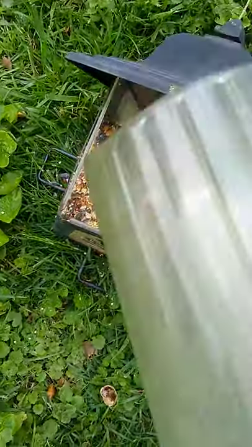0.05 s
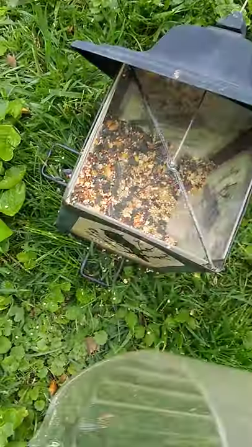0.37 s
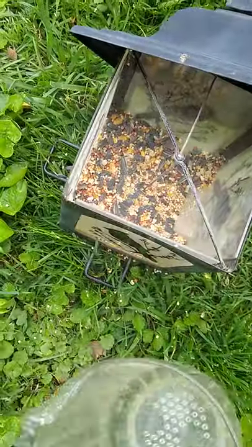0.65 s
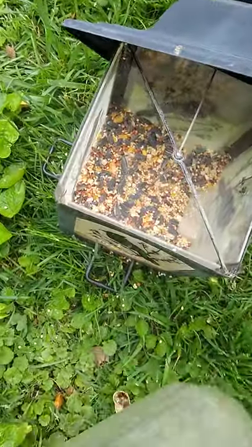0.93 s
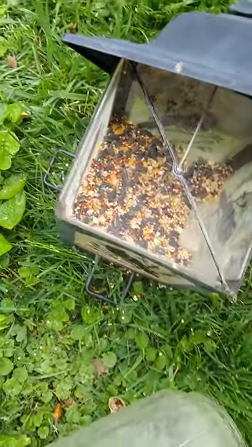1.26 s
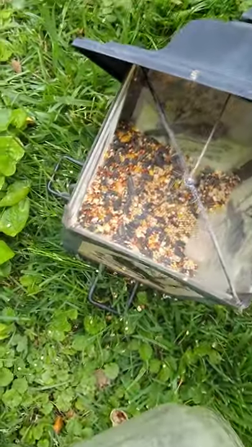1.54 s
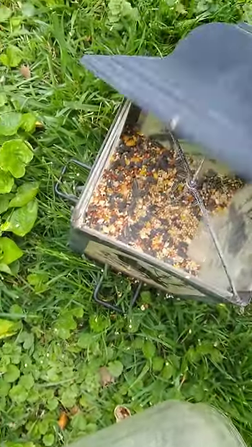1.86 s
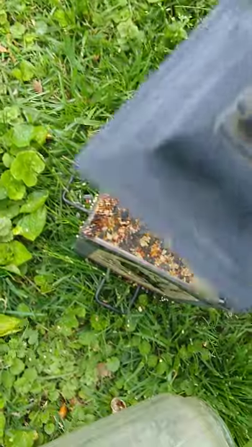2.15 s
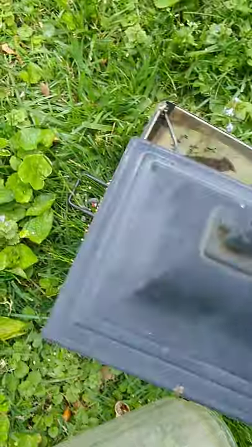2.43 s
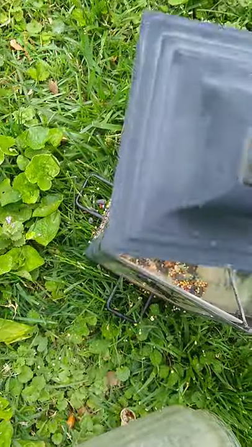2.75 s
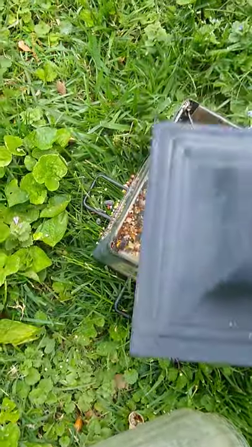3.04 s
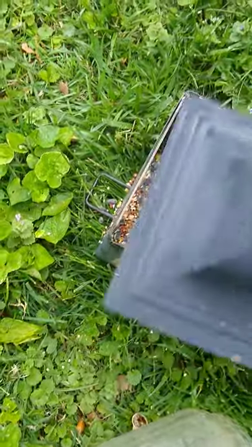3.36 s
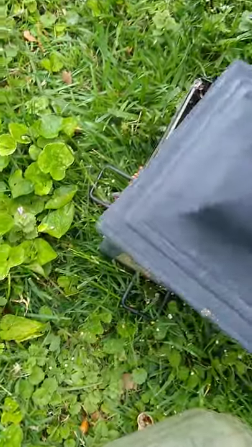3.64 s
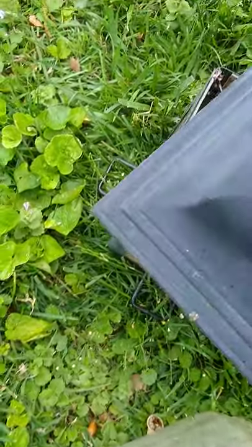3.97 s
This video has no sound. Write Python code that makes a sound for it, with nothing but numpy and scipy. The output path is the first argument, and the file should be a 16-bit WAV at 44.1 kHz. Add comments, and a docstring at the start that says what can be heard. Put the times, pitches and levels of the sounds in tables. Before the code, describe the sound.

A sheet-metal lid clanks against a bird feeder close below the microphone. After a moment of quiet garden air come a short clatter, a few separate ringing knocks and a final quick rattle, over soft handling rumble.

```python
"""In a garden, a sheet-metal lid is fitted onto a bird feeder standing in grass, close below the mic.
The lid knocks and rattles on the feeder's rim. Each contact rings its modes according to where it lands,
with a wash of dense overtones, a short crack and a thud of the box.
Quiet outdoor air lies underneath; a soft handling rumble joins just before the first knock."""
import sys
import numpy as np
from scipy import signal
from scipy.fft import rfft, irfft
from scipy.io import wavfile

SR = 44100
rng = np.random.default_rng(int(sys.argv[2]) if len(sys.argv) > 2 else 0)


def transcribe(u):
    """Save the signal u as a 16-bit wav file named by the first command-line argument.

    u: samples, shape (n,) or (channels, n), limited to [-1, 1]; the rate is SR.
    q: integer samples, one column per channel.
    """
    v = np.clip(np.atleast_2d(u).T, -1, 1)
    q = np.round(v * 32767).astype(np.int16)
    wavfile.write(sys.argv[1], SR, q)


N = 176400


def undb(db):
    """Decibels to gain."""
    return 10 ** (np.asarray(db) / 20)


def at(points, hz):
    """Read a (Hz, value) table on a log-frequency axis."""
    f, v = np.array(points, float).T
    return np.interp(np.log(np.maximum(hz, 1)), np.log(f), v)


def bins(size):
    """FFT bin frequencies in Hz."""
    return np.arange(size // 2 + 1) * SR / size


def noise(spectrum, size):
    """Unit-rms noise shaped by a (Hz, dB) table."""
    x = irfft(rfft(rng.standard_normal(size)) * undb(at(spectrum, bins(size))), size)
    return x / x.std()


def noise_pair(spectrum, size):
    """Two independent noises of one spectrum."""
    return np.array([noise(spectrum, size), noise(spectrum, size)])


def fade(t, t60_s):
    """Exponential decay, 60 dB in t60_s."""
    return np.exp(-np.log(1000) * t / t60_s)


def pan(db):
    """Left and right gain rows for L-R differences in dB."""
    return undb(np.outer([1, -1], db) / 2)


def add(out, x, start_s):
    """Mix stereo x into out at start_s."""
    i = int(start_s * SR)
    x = x[:, :N - i]
    out[:, i:i + x.shape[1]] += x


def diffuse_noise(spectrum):
    """Diffuse noise at the two mic ports; the bass is in antiphase."""
    # Stereo width. Each row: frequency in Hz, side minus mid in dB.
    width = [(60, 14.5), (110, 14.5), (200, 2), (380, -0.5), (700, -11.5), (1290, -7), (2380, 4.5),
             (4400, -2), (15000, 0)]
    side = irfft(rfft(noise(spectrum, N)) * undb(at(width, bins(N))), N)
    mid = noise(spectrum, N)
    return (mid + np.outer([1, -1], side)) * pan(db=-0.5)


def garden():
    """Low outdoor rumble and faint hiss, swelling slowly."""
    # Outdoor air. Each row: frequency in Hz, relative density in dB.
    spectrum = [(15, -61.5), (25, -17), (122, -2), (221, -5), (281, -14), (313, -6), (445, -18.5),
                (567, -14.5), (782, -16.5), (1080, -15.5), (1950, -25), (2230, -29), (3260, -20.5),
                (4500, -30.5), (4870, -26.5), (6920, -39), (15500, -44.5)]
    swell_db = -0.48 * np.interp(np.arange(N), np.linspace(0, N, 20), rng.standard_normal(20))
    return diffuse_noise(spectrum) * undb(-65.5 + swell_db)


def handling(start_s=1.95, rise_s=0.085):
    """Soft rumble once the lid is being moved about."""
    # Rumble. Each row: frequency in Hz, relative density in dB.
    spectrum = [(30, -19.5), (70, 3), (120, 1.5), (220, -1.5), (400, -9), (900, -13.5), (3000, -45.5)]
    onset = np.clip((np.arange(N) / SR - start_s) / rise_s, 0, 1)
    return diffuse_noise(spectrum) * undb(-66.5) * onset


def box_thud(t, knock_db):
    """Thud of the feeder box; follows about half of the knock's level in dB."""
    # Box response. Each row: frequency in Hz, relative density in dB.
    spectrum = [(25, -31), (70, 4.5), (130, -2), (250, 3.5), (450, 0), (900, 3.5), (2500, -34)]
    thud = noise(spectrum, len(t)) + 0.5 * noise_pair(spectrum, len(t))
    return undb(-40 + 0.53 * knock_db) * thud * fade(t, t60_s=0.23)


def contact_crack(t):
    """Short noise burst of the contact, as two independent signals."""
    # Contact noise. Each row: frequency in Hz, relative density in dB.
    spectrum = [(30, -36.5), (150, -13), (400, -4.5), (800, 10), (1500, -0.5), (2100, 2), (3500, -12),
                (5500, -4.5), (7000, -13), (15500, -31.5)]
    return undb(-22.5) * noise_pair(spectrum, len(t)) * fade(t, t60_s=0.039)


def dense_modes(t, count=220):
    """The sheet's many weak modes, in sine and cosine phase; higher ones tend to die sooner."""
    # Overtone envelope. Each row: frequency in Hz, level per mode in dB.
    levels = [(450, -51.5), (700, -46), (1000, -44.5), (1500, -41), (2000, -49.5), (2500, -40), (3500, -38),
              (5500, -44), (6700, -55), (8000, -55.5), (11000, -61), (15500, -64.5)]
    hz = np.linspace(np.sqrt(450), np.sqrt(15500), count) ** 2
    hz *= 1 + 0.008 * rng.standard_normal(count)
    t60_s = 0.18 * (3000 / hz) ** 0.16 * np.exp(0.22 * rng.standard_normal(count))
    phase = np.outer(2 * np.pi * hz, t)
    decay = undb(at(levels, hz))[:, None] * fade(t, t60_s[:, None]) / np.sqrt(2)
    return np.vstack([decay * np.sin(phase), decay * np.cos(phase)])


def lid_ring(place, t):
    """Stereo spectra of the main ring and soft after-ring for one place of contact; close modes beat."""
    # Lid modes. Each row: frequency in Hz, T60 in s, L-R in dB, level in dB struck at corner, side, rim.
    modes = [ (427.2, 0.79, 5.5, -63, -54.5, -49), (595, 0.067, 4.5, -39, -26, -40.5),
             (660.5, 0.2, 2, -27.5, -21, -36), (681.4, 0.198, 3, -29.5, -23.5, -53.5),
             (867, .13, 2, -30, -36, -23), (925, .08, 1, -23, -33, -35), (1000, .07, 0, -25, -31, -38),
             (1329.5, .29, -1, -31, -26, -31), (1424, .28, -5, -37, -22, -29),
             (1608.4, 0.19, -6, -33, -27.5, -40.5), (1905, 0.11, -1, -40.5, -25, -29.5),
             (2260, .17, -0.5, -28.5, -35.5, -28.5), (2335, 0.16, 5, -39, -23, -45),
             (2370, 0.44, 1.5, -25, -27.5, -38), (2442, 0.33, 3, -22.5, -25.5, -31),
             (2490, .22, -1, -28, -44, -31), (2625, .22, 2, -44, -23, -45), (2793, .2, 2, -30, -38, -33),
             (3146, .25, 3, -32, -27, -32), (3199, .23, 5, -30, -35, -50), (3350, .16, 5, -28, -44, -46),
             (3495, .2, 3, -36, -33, -46), (3732, .14, 7, -26, -42, -44), (3947, .18, 5, -35, -27, -45),
             (3978, .19, 8, -27, -30, -36), (4258, .17, 3, -35, -38, -43), (4715, .17, 9, -28, -31, -44),
             (5100, 0.23, 17, -46.5, -42.5, -46.5), (5300, 0.12, 3, -52, -33.5, -51.5),
             (5480, 0.12, 3.5, -48, -26.5, -43), (5560, 0.21, 6, -45, -34.5, -40),
             (6155, 0.11, 5, -36.5, -37, -47)]
    # Modes that sing on. Each row: frequency in Hz (picks the nearest mode), T60 in s, level in dB.
    lingering = [(685, 1.9, -53.5), (1329, 1.19, -43), (1430, 0.33, -41.5), (3146, 1.18, -50),
                 (3199, 0.85, -54.5)]
    hz, t60_s, pan_db, corner_db, side_db, rim_db = np.array(modes, float).T
    mode_db = {"corner": corner_db, "side": side_db, "rim": rim_db}[place]
    polarity = (-1) ** np.arange(len(hz))[:, None]
    waves = polarity * np.sin(np.outer(2 * np.pi * hz, t))
    gains = pan(pan_db)
    ring = (gains * undb(mode_db)) @ (waves * fade(t, t60_s[:, None]))
    after_ring = np.zeros_like(ring)
    for slow_hz, slow_t60_s, db in lingering:
        k = np.argmin(abs(hz - slow_hz))
        envelope = fade(t, slow_t60_s) * (1 - fade(t, slow_t60_s / 2))
        after_ring += np.outer(gains[:, k], undb(db) * waves[k] * envelope)
    return rfft(ring), rfft(after_ring)


def lid_knocks():
    """Each knock rings the same sheet, coloured by how hard and sharp the contact is; the box thuds."""
    # Contacts. Each row: start in seconds, place, level in dB, then offsets in dB for
    # bass, middle, top, dense overtones, crack, after-ring.
    knocks = [ (2.0403, "corner", -0.5, -3, -2.5, 1, 1, 0.5, -10),
              (2.0660, "corner", -7.5, -1, 6.5, 2.5, 0, 3, -22),
              (2.0905, "side", -13, 7.5, 2, -1.5, -1, 3, -21),
              (2.1420, "side", -25, 9.5, -1, -8, -9, 3, -16),
              (2.4440, "side", -19.5, 6.5, 4, -11.5, -0.5, 6.5, 3.5),
              (2.4670, "corner", -35.5, -8, 11, 1.5, -15, 14, -9),
              (2.8378, "side", 1, 1.5, -1.5, -3.5, 0, 0.5, 0.5),
              (2.8725, "side", -8.5, 10, -3.5, -3.5, 0.5, 1.5, -9),
              (3.3730, "side", -9, -12, -11.5, -10.5, -2, 10, 0),
              (3.6870, "rim", 0, -1.5, -3, -5.5, -9, -6, 5),
              (3.7255, "side", -24, 8, 3, -14, -12, -11, -16),
              (3.8290, "rim", -0.5, 2, -6.5, -15.5, -3.5, -6.5, -5),
              (3.8655, "rim", -8.5, 8, -0.5, -7.5, -3.5, -1.5, 5),
              (3.8925, "rim", -8.5, 9.5, -6.5, -16, -5, -7, 0),
              (3.9200, "side", -8.5, 3.5, -6, -11, 2, 2.5, 11),
              (3.9570, "corner", -23, 9, 6, -12, 2, -10, -5)]
    # Phase between the mic ports. Each row: frequency in Hz, lead of the left in radians.
    port_phase = [(20, 0), (900, 0), (1330, .3), (1600, .7), (1880, 2.4), (2300, 3), (2750, 3.6),
                  (3146, 6.2), (3500, 6.4), (3960, 7.9), (4715, 9.6), (6135, 13.3), (16000, 38.3)]
    # Balance of overtones and crack. Each row: frequency in Hz, L-R in dB.
    port_balance = [(200, 3), (600, 6), (1000, 1), (1600, -6), (2400, 5.5), (3500, 3.5), (5000, 7.5),
                    (8000, 11), (14000, 6.5)]
    # Their part that differs between ports. Each row: frequency in Hz, side minus mid in dB.
    port_scatter = [(500, -20.5), (2000, -9.5), (5000, -10.5), (9000, -5.5)]
    t = np.arange(SR) / SR
    t_short = t[:SR // 3]
    hz = bins(len(t))
    rings = {place: lid_ring(place, t) for place in ("corner", "side", "rim")}
    overtones = dense_modes(t_short)
    balance = pan(at(port_balance, hz))
    scatter = np.outer([1, -1], undb(at(port_scatter, hz)))
    lead_s = 0.02  # room for filter pre-ringing
    lag_rad = np.outer([0, 1], np.interp(hz, *np.array(port_phase).T))
    port_delay = np.exp(-1j * (lag_rad + 2 * np.pi * hz * lead_s))
    out = np.zeros((2, N))
    for start_s, place, db, bass_db, middle_db, top_db, dense_db, crack_db, after_db in knocks:
        crack = undb(crack_db) * contact_crack(t_short)
        wash = undb(dense_db) * (rng.standard_normal((2, len(overtones))) @ overtones)
        mid, side = rfft(crack + wash, len(t))
        ring, after_ring = rings[place]
        knock = ring + undb(after_db) * after_ring + balance * (mid + scatter * side)
        colour_db = at([(800, bass_db), (1450, middle_db), (2400, 0), (9000, top_db)], hz)
        add(out, irfft(knock * undb(db + colour_db) * port_delay), start_s - lead_s)
        add(out, box_thud(t_short, db), start_s)
    return out


def scene():
    """The lid and its handling over the garden background."""
    return lid_knocks() + handling() + garden()


def record(dry):
    """The lowest bass is rolled off, and the recorder cuts the top."""
    low_cut_hz, high_cut_hz = 58, 15800
    highpass = signal.butter(2, low_cut_hz, "high", fs=SR, output="sos")
    lowpass = signal.ellip(10, 0.2, 70, high_cut_hz, fs=SR, output="sos")
    return signal.sosfilt(lowpass, signal.sosfilt(highpass, dry))


dry = scene()
out = record(dry)
transcribe(out)
```